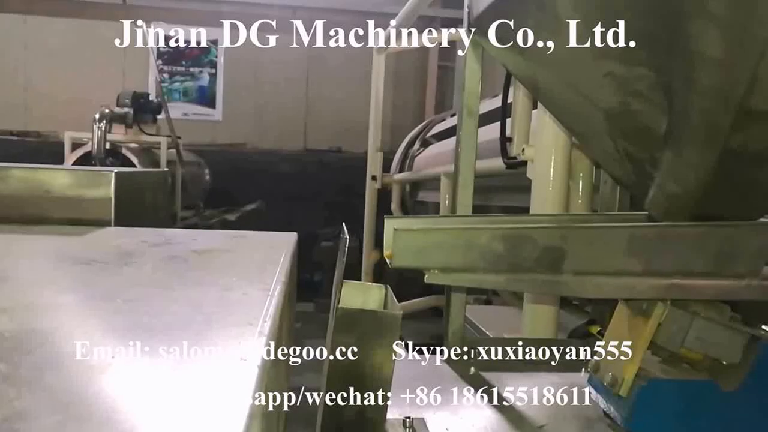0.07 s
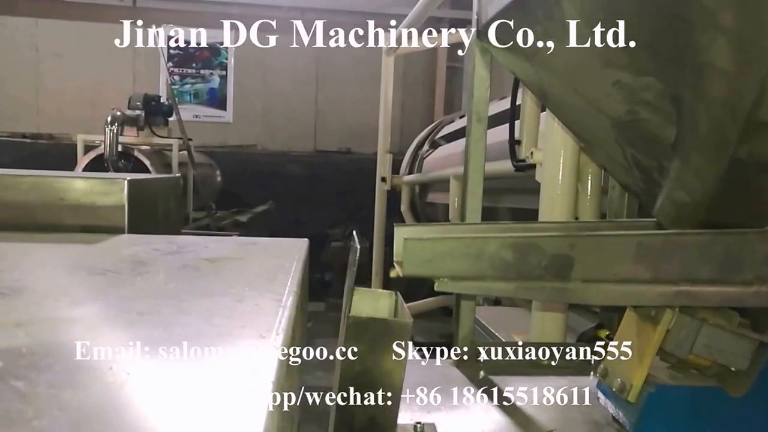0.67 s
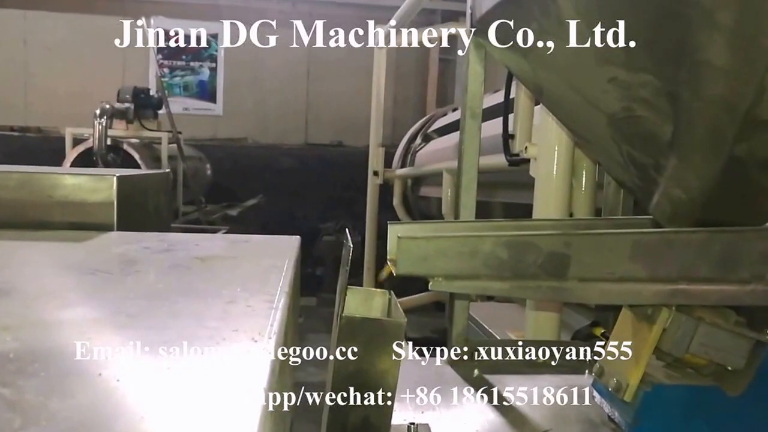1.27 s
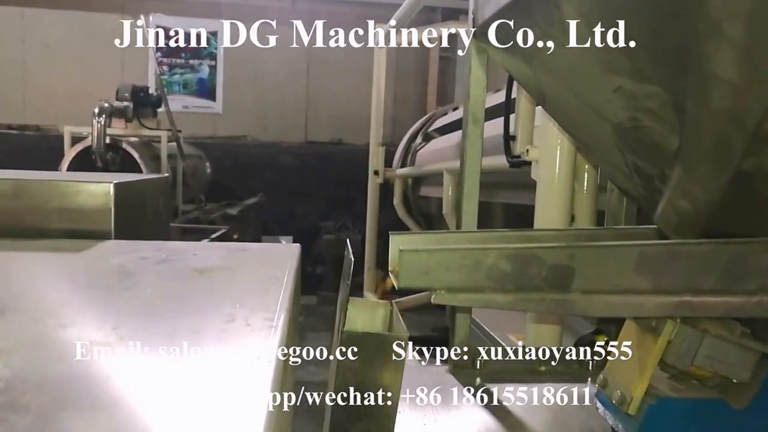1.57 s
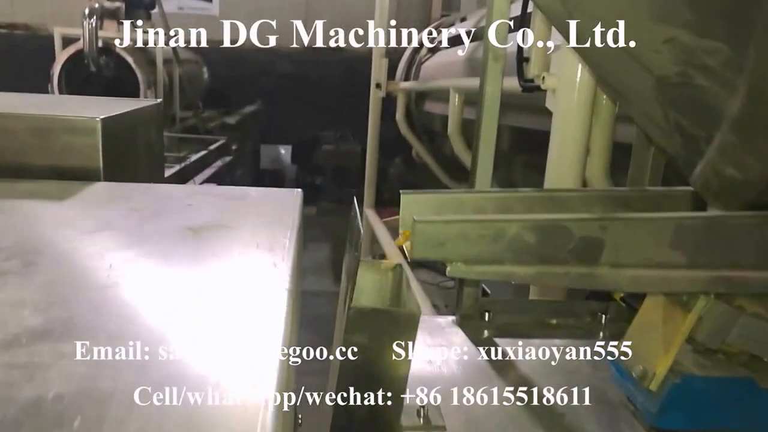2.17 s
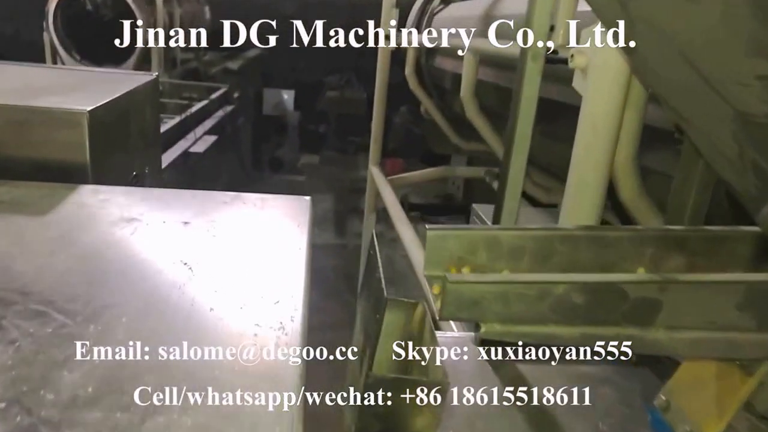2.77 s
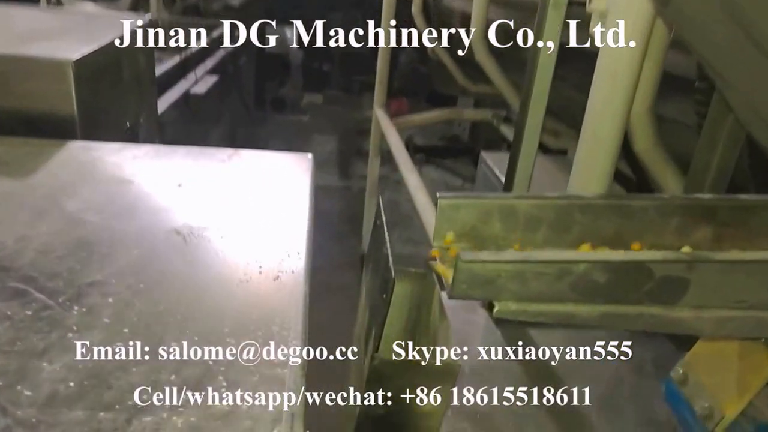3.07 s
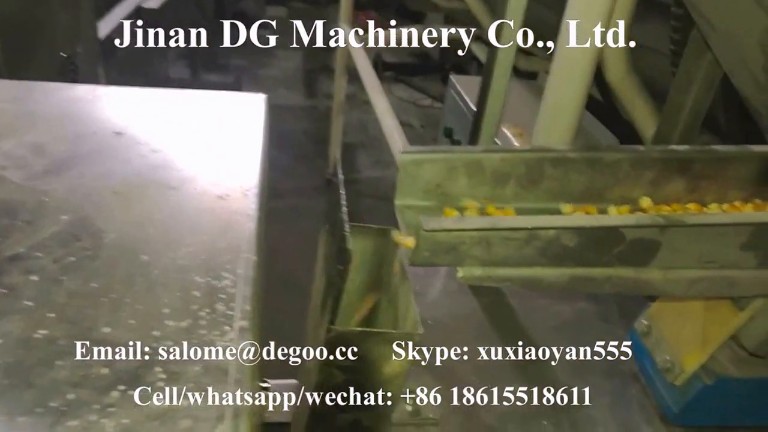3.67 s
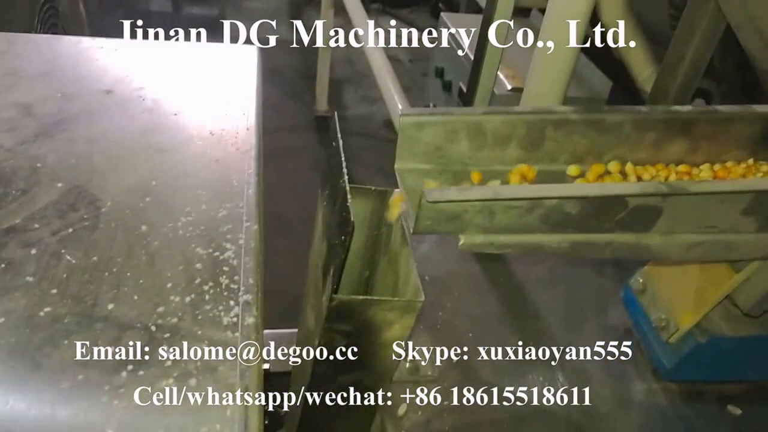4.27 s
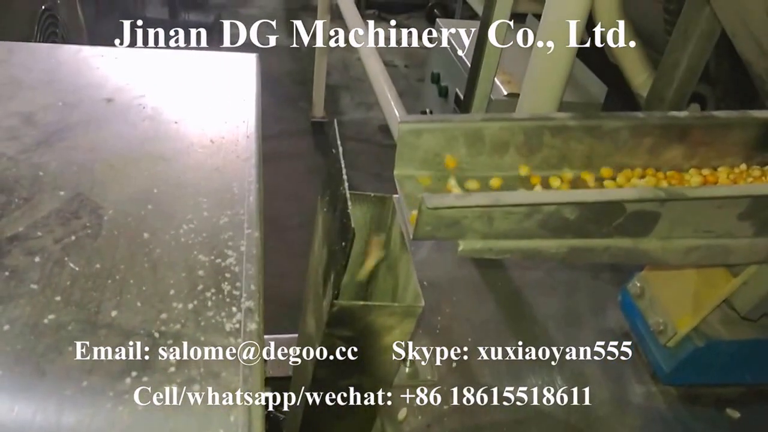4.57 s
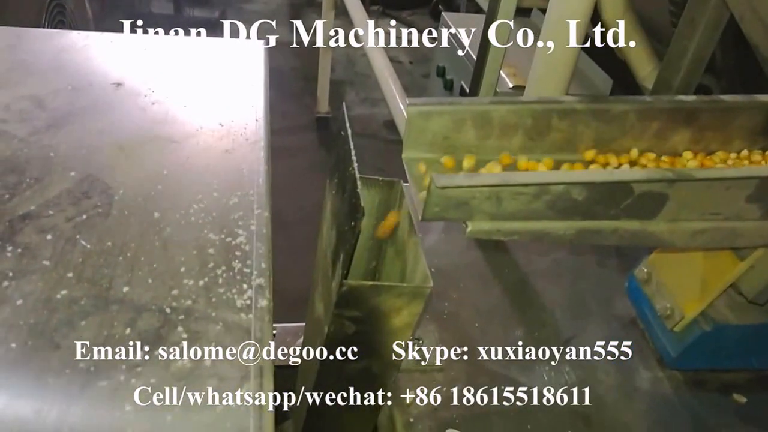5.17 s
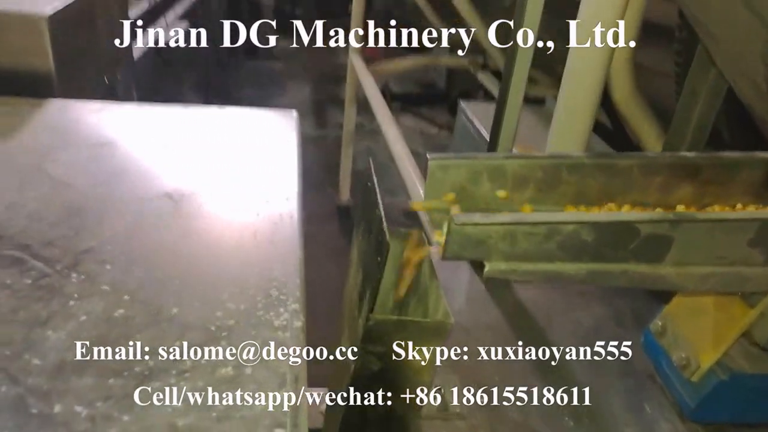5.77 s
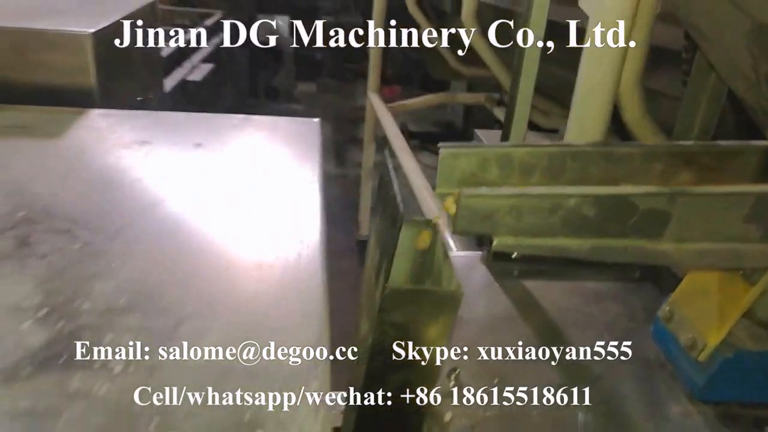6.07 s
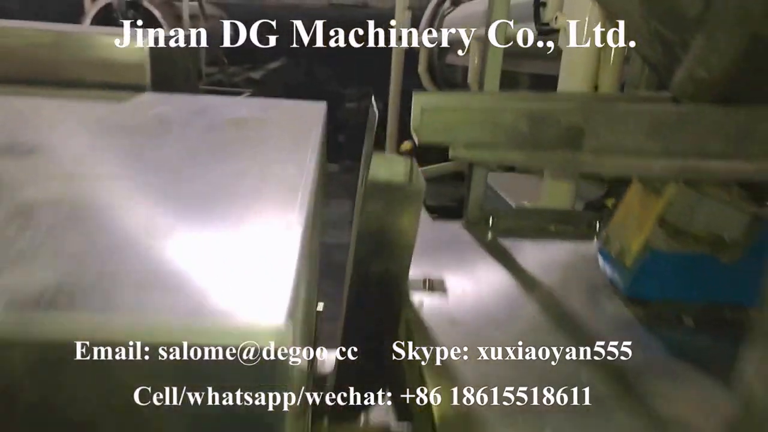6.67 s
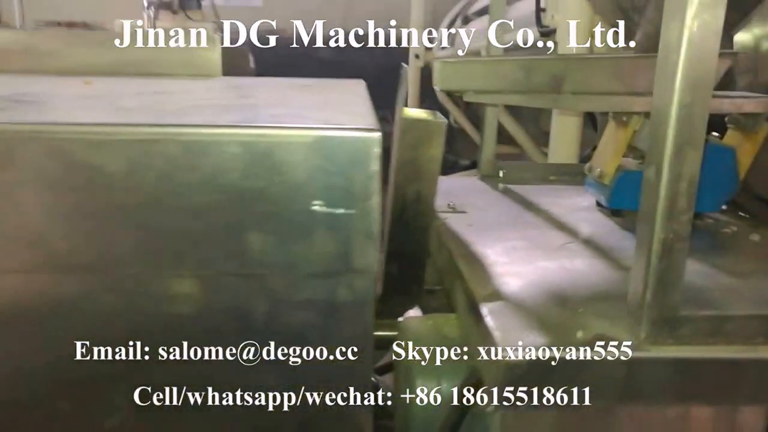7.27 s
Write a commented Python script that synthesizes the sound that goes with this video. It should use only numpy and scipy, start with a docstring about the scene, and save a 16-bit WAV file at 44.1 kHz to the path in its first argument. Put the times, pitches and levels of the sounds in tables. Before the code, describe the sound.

Loud factory machinery hums and rattles as little hard pieces tick against sheet steel, with three close knocks as the noise sinks.

```python
"""In a factory hall, a vibrating steel feeder shakes hard little snack pieces along its trough into a chute.
The pieces hop in step with the 50 Hz drive, and their impacts excite the modes of the sheet metal.
A big hopper drones at its panel resonances, the magnet hums, and three knocks sound at the microphone.
The drone and rattle step down after two of the knocks and keep sinking, the patter grows fainter,
and a farther machine is heard swishing twice a second."""
import sys
import numpy as np
from scipy import signal
from scipy.fft import rfft, irfft, next_fast_len
from scipy.io import wavfile
from scipy.ndimage import uniform_filter1d

SR = 44100
rng = np.random.default_rng(int(sys.argv[2]) if len(sys.argv) > 2 else 0)


def pcm_store(signal):
    """Save signal as 16-bit PCM."""
    levels = np.round(np.clip(np.atleast_2d(signal), -1, 1) * 32767)
    wavfile.write(sys.argv[1], SR, levels.astype(np.int16).T)


N = 322812
TIME = np.arange(N) / SR

# Modes of the chute and of the trough's lip. Each row: frequency in Hz, relative level in dB.
CHUTE_MODES = [(7930, -4), (9290, 0), (9570, -5), (9730, -1), (10450, -4), (10977, -1), (11304, -4),
               (11882, -3), (12180, -1), (12455, -3), (14249, -6)]
LIP_MODES = [(1690, 0), (1860, 3.5), (2100, 1), (2370, 2), (2634, 1), (3190, 2), (3439, -3), (4015, 2.5),
             (4294, 0), (4450, -2), (4909, 1), (5185, 0), (5580, -2), (7090, 3)]
# Spectra of a bright tick and a duller clank. Each row: frequency in Hz, relative density in dB.
TICK_SPECTRUM = [(1000, -44), (4000, -10), (7900, -4), (8600, -4.5), (9400, 2), (12800, 0.5), (14500, -2),
                 (16000, -4.5)]
CLANK_SPECTRUM = [(300, -18), (1400, -12), (2400, -2), (3200, 1), (5100, 1), (8000, -4.5), (16000, -45)]


def trough(din_db, sing_start_s=1.41, sing_end_s=2.47, sing_edge_s=.044):
    """Impact excitation: hopping pieces rattle the trough, and the heavier ones ring its modes."""
    # Each row: frequency in Hz, relative level in dB, time to decay by 60 dB in seconds.
    trough_modes = [(2095, -10, .12), (2355, -9, .7), (2388, -9, .9), (2520, -8, .12), (2636, 0, .17),
                    (3140, -1.5, .08), (3283, -4, .6), (3439, -5, .25), (4908, -6.5, .2), (5860, -9, .3),
                    (6220, -7, .3)]
    # Each row: frequency in Hz, relative density in dB.
    rattle_spectrum = [(500, -11.5), (1400, -2), (2000, 3), (3300, 4), (3700, 1), (4300, 1.5), (5100, 2.5),
                       (5450, 0), (7600, 1), (10000, -12.5), (16000, -26)]
    hits = impacts(per_s=650 * from_db(din_db / 2), spread_db=6.5, bunching=.6)
    heavy_hits = impacts(per_s=60, spread_db=3.5, bunching=.6)
    # For a spell the trough sings out, one mode above all.
    spell = np.clip(np.minimum(TIME - sing_start_s, sing_end_s - TIME) / sing_edge_s, 0, 1)
    ringing = evened(modes(heavy_hits, trough_modes), size=SR // 2)
    leading = evened(ring(hits * rng.standard_normal(N), hz=2388, t60=.6))
    rattle = evened(struck(hits, rattle_spectrum, t60=.066))
    return (from_db(-33.5 + 1.2 * din_db + 4.5 * spell) * ringing
            + from_db(-37) * spell * leading
            + from_db(-26.8 + 1.33 * din_db) * rattle)


def patter(stream_db):
    """Superposition: the ticks of many pieces tumbling into the chute merge into a patter."""
    hits = impacts(per_s=340, spread_db=5.7, bunching=.9)
    ticks = rms_one(struck(hits, TICK_SPECTRUM, t60=.045))
    ringing = from_db(-10.5) * modes(hits, CHUTE_MODES, t60=.075)
    return from_db(-28.5 + .84 * stream_db) * evened(ticks + ringing)


def hard_landings(clink_hz=3180):
    """Rebound: a piece ticks, clanks and rings the chute at each contact; the lip clinks once."""
    # Each row: start in seconds, relative tick level in dB, relative clank and clink level in dB.
    landings = [(0.5472, -12, -27), (0.618, -13, -27), (0.7223, -16, -23), (0.9038, -13, -25),
                (1.1792, -9.5, -20), (1.4098, -13, -24), (1.6656, -10, -21), (1.6824, -9, -23),
                (2.0638, -13, -26), (2.1046, -14, -19), (2.2338, -12, -19), (2.2928, -16, -20),
                (2.3236, -14, -19), (2.3735, -10, -22), (2.3884, -11, -22), (2.4704, -12, -28),
                (2.7457, -9.5, -19), (2.872, -10, -26), (3.0396, -13, -21), (3.1279, -11.5, -30),
                (3.3214, -7.5, -20), (3.3599, -9, -29), (3.5064, -10, -32), (3.705, -11.5, -32),
                (3.9544, -16, -30), (3.9909, -14, -37), (4.137, -12, -37), (4.2014, -14, -40),
                (4.31, -16, -38), (4.4629, -14, -33), (4.688, -9.5, -33), (4.9038, -16, -44),
                (5.3503, -16.5, -39), (5.4211, -18, -46), (5.745, -21, -41), (6.0701, -20, -39),
                (6.295, -22, -42)]
    # A piece chatters, hops and comes down again. Each row: mean delay in seconds, gain in dB.
    contacts = [(0, 0), (.003, -4.5), (.007, -7), (.039, -10)]
    out, hits = np.zeros(N + SR), np.zeros(N)
    for start_s, tick_db, clink_db in landings:
        tick = sheet(TICK_SPECTRUM, t60=.05, tail_db=-18, rise_s=.0003, uneven_db=4)
        clank = sheet(CLANK_SPECTRUM, t60=.07, tail_db=-14)
        blow = from_db(tick_db - 7.5) * tick + from_db(clink_db - 8.5) * clank
        for delay_s, db in contacts:
            at = int((start_s + delay_s * rng.uniform(.85, 1.15)) * SR)
            hits[at] = from_db(tick_db + db)
            out[at:at + len(blow)] += from_db(db) * blow
    strikes = [(start_s, clink_db - 2, clink_hz) for start_s, _, clink_db in landings]
    clinks = lip_strikes(strikes, t60=.096, attack_s=.0012)
    return out[:N] + from_db(-40) * modes(hits, CHUTE_MODES, t60=.09) + clinks


def lip_tinkle(stream_db):
    """Free vibration: single pieces clank on the lip and leave its modes to die away."""
    hits = impacts(per_s=65, spread_db=3.5, bunching=.7)
    ringing = modes(hits, LIP_MODES, t60=.15)
    clanks = from_db(-1.5) * rms_one(struck(hits, CLANK_SPECTRUM, t60=.07))
    return from_db(-39.7 + .5 * stream_db) * evened(ringing + clanks, size=SR // 2)


def lip_pings():
    """Light damping: some pieces leave the lip ringing long enough for a clear pitch."""
    # Each row: start in seconds, level at the favoured pitch in dB, that pitch in Hz.
    strikes = [(0.515, -29, 3439), (0.55, -28, 2634), (0.64, -27, 4909), (0.75, -27, 2634),
               (0.904, -26, 4370), (1.185, -27, 4909), (1.195, -26, 3439), (1.275, -25, 2634),
               (1.505, -25, 2634), (1.68, -24, 2634), (1.76, -28, 4909), (1.79, -22, 2634),
               (2.324, -24, 3439), (2.38, -28, 4909), (3.17, -30, 2355), (3.758, -33, 4400),
               (3.945, -34, 2355), (4.185, -34, 4015), (4.995, -38, 1860), (5.004, -38, 2634),
               (5.042, -37, 1860), (5.155, -37, 2400), (5.555, -41, 4015), (5.935, -39.5, 4100),
               (5.99, -37, 2355), (5.69, -40, 3190), (6.09, -42, 4294), (6.55, -41, 4909),
               (6.575, -41, 4015), (6.58, -38, 3190)]
    return lip_strikes(strikes, t60=.28, attack_s=.005)


def lip_strikes(strikes, t60, attack_s, fall_db_per_octave=80):
    """Selective excitation: a strike rings the lip's modes near the pitch that its spot favours."""
    out, t = np.zeros(N + SR), TIME[:SR // 4]
    hz = np.transpose(LIP_MODES)[0]
    envelope = np.minimum(t / attack_s, 1) * from_db(-60 * t / t60)
    partials = np.sin(2 * np.pi * np.outer(hz, t)) * envelope
    for start_s, db, favoured_hz in strikes:
        gains = from_db(db - fall_db_per_octave * abs(np.log2(hz / favoured_hz)))
        at = int(start_s * SR)
        out[at:at + len(t)] += (gains * rng.choice([-1, 1], len(hz))) @ partials
    return out[:N]


def radiated(x):
    """Radiation efficiency: lip and chute give off hardly any sound in a few narrow bands."""
    # Each row: centre frequency in Hz, width in Hz.
    dead_bands = [(2920, 90), (3700, 260), (5400, 380), (6060, 170)]
    for hz, width in dead_bands:
        x = signal.lfilter(*signal.iirnotch(hz, hz / width, fs=SR), x)
    return x


def hopper(din_db):
    """Forced vibration: the shaken hopper's panels drone, over a rumble and the drive's hum."""
    # Each row: frequency in Hz, width in Hz, relative level in dB.
    panel_modes = [(204, 12, -10.5), (245, 32, -9), (296, 30, -2), (314, 30, -12), (472, 28, -18)]
    # Each row: frequency in Hz, level against the drone at full din in dB, dB gained per dB of din.
    hum_tones = [(100, -19, 0), (755, -19, .6)]
    # Two low noises. Each row: frequency in Hz, relative density in dB.
    boom_spectrum = [(25, -27), (60, -0.5), (130, -6.5), (190, 4.5), (400, -3.5), (700, -7.5), (3000, -65)]
    rumble_spectrum = [(400, 0), (700, -2.5), (850, 3.5), (1200, 1), (1500, -7.5), (2500, -1),
                       (6000, -16.5)]
    # The drone swells. Each row: time of the peak in seconds, rise in dB.
    swells = [(0.4, 2), (0.91, 2.5), (1.36, 3), (1.62, 2.5), (3.28, 3.5), (5.19, 3), (5.55, 4.5),
              (7.26, 7.5)]
    # The big wall booms above the other panels and drops back as the din sinks.
    wall = from_db(2.3 + .36 * din_db) * panel(hz=268, width_hz=16)
    panels = wall + sum(from_db(db) * panel(hz, width) for hz, width, db in panel_modes)
    hum = sum(from_db(db + slope * din_db) * np.sqrt(2) * np.sin(2 * np.pi * (hz * TIME + rng.random()))
              for hz, db, slope in hum_tones)
    drone = evened(panels, size=SR // 3) + hum + from_db(-6.5) * noise(boom_spectrum)
    rumble = from_db(-31 + 1.45 * din_db) * noise(rumble_spectrum)
    return from_db(-29.5 + din_db + bumps(swells, width_s=.11)) * drone + rumble


def close_knocks(bump_hz=38, bump_t60=.069):
    """Damped transients: each knock at the microphone is a dry crack, a low thud and a deep bump."""
    # Each row: start in seconds, thud gain in dB, crack gain in dB.
    knocks = [(3.322, -38, -16.5), (3.705, -33, -28), (4.689, -30, -21.5)]
    out, t = np.zeros(N + SR), TIME[:SR // 4]
    bump = from_db(5 - 60 * t / bump_t60) * np.sin(2 * np.pi * bump_hz * t)
    for start_s, thud_db, crack_db in knocks:
        thud = sheet([(35, 2), (80, -2), (200, -5), (2000, -48)], t60=.061, tail_db=-22, uneven_db=3)
        crack = sheet([(200, -4), (1600, -2), (16000, -19)],
                      t60=.015, tail_db=-37, rise_s=.00051, uneven_db=4)
        at = int(start_s * SR)
        out[at:at + len(t)] += from_db(thud_db) * (bump + thud) + from_db(crack_db) * crack
    return out[:N]


def far_machine(period_s=.508, beat_at_s=5.135, attack_s=.0061, hold_s=.035, fade_s=.38):
    """Reverberant decay: a farther machine swishes once a cycle, and each swish fades in the hall."""
    # Each row: frequency in Hz, relative density in dB.
    swish_spectrum = [(200, -17), (500, -3.5), (900, 5), (1500, 1.5), (4000, 1.5), (7000, -8), (16000, -22)]
    age = (TIME - beat_at_s) % period_s
    stroke = np.minimum(age / attack_s, 1) * np.exp(-np.maximum(age - hold_s, 0) / fade_s)
    level_db = in_time([(5.04, -45), (5.6, -39)])
    return from_db(level_db) * stroke * noise(swish_spectrum)


def hall():
    """Ambient noise: the rest of the hall blends into a steady broadband floor."""
    # Each row: frequency in Hz, relative density in dB.
    hall_spectrum = [(25, 6), (90, 12), (500, 9.5), (1000, 0), (2000, 10.5), (4000, 2.5), (16000, -14)]
    return from_db(-48.5) * noise(hall_spectrum)


def impacts(per_s, spread_db, bunching, drive_hz=49.97):
    """A modulated Poisson process: landings of uneven force bunch on the upstroke of the drive."""
    stroke = np.exp(bunching * np.sin(2 * np.pi * drive_hz * TIME - 2 * np.pi / 3))
    landed = rng.random(N) < per_s * stroke / stroke.mean() / SR
    return landed * from_db(spread_db * np.clip(rng.standard_normal(N), -2, 2))


def struck(hits, spectrum, t60, dwell_s=.05, spots=22):
    """Convolution: each spot has its own response, so the timbre shifts as the pieces move about."""
    visit = (TIME / dwell_s + 2 * rng.random(N)).astype(int)
    spot = rng.integers(0, spots, N)[visit]
    blows = [rms_one(sheet(spectrum, t60, tail_db=-9)) for _ in range(spots)]
    return sum(signal.oaconvolve(hits * (spot == k), blow)[:N] for k, blow in enumerate(blows))


def sheet(spectrum, t60, tail_db, rise_s=.0033, uneven_db=4.5, tail_t60=.22):
    """Dense modes: a blow, as on sheet steel, is unevenly coloured noise dying fast to a faint tail."""
    t, hz = TIME[:SR // 4], np.geomspace(30, 16000, num=220)
    points_hz, points_db = np.transpose(spectrum)
    colour_db = np.interp(np.log(hz), np.log(points_hz), points_db)
    colour_db += uneven_db * rng.standard_normal(len(hz))
    fading = from_db(-60 * t / t60) + from_db(tail_db - 60 * t / tail_t60)
    return noise(np.column_stack([hz, colour_db]), size=len(t)) * fading * (1 - np.exp(-t / rise_s))


def modes(hits, table, t60=None):
    """Modal sum at rms 1: each landing excites each mode anew; a given t60 sets all the decays."""
    at, out = np.flatnonzero(hits), 0
    strengths = rng.standard_normal((len(at), len(table)))
    for (hz, db, *own_t60), strength in zip(table, strengths.T):
        force = np.zeros(N)
        force[at] = hits[at] * strength
        out = out + from_db(db) * rms_one(ring(force, hz, t60 or own_t60[0]))
    return rms_one(out)


def panel(hz, width_hz):
    """Resonance: a randomly shaken panel gives a narrow, throbbing tone with steep skirts; rms 1."""
    t60 = np.log(1000) / np.pi / width_hz
    return rms_one(ring(ring(rng.standard_normal(N), hz, t60), hz, t60))


def ring(force, hz, t60):
    """A damped oscillator: one mode that decays by 60 dB in t60 seconds."""
    radius, angle = from_db(-60 / (t60 * SR)), 2 * np.pi * hz / SR
    feedback = [1, -2 * radius * np.cos(angle), radius * radius]
    return signal.lfilter([np.sin(angle), 0, -np.sin(angle)], feedback, force + 1e-18)


def noise(spectrum, size=N):
    """Spectral shaping: noise coloured by (Hz, dB) points and rolled off below 20 Hz; rms 1."""
    hz, db = np.transpose(spectrum)
    length = next_fast_len(size, True)
    bins = np.maximum(np.fft.rfftfreq(length, 1 / SR), 1)
    gain = from_db(np.interp(np.log(bins), np.log(hz), db)) * bins / np.hypot(bins, 20)
    return rms_one(irfft(rfft(rng.standard_normal(length)) * gain, length)[:size])


def evened(x, size=SR // 7):
    """Division by the running rms holds the slow level at 1 and keeps the fast detail."""
    return x / np.sqrt(np.abs(uniform_filter1d(x * x, size=size)) + 1e-12)


def rms_one(x):
    """Normalisation to rms 1."""
    return x / np.sqrt(np.mean(x ** 2) + 1e-20)


def from_db(db):
    """Decibels to amplitude ratio."""
    return 10 ** (np.asarray(db) / 20)


def in_time(curve):
    """Linear interpolation between (seconds, value) points."""
    return np.interp(TIME, *np.transpose(curve))


def bumps(table, width_s):
    """Gaussian rises or falls of level, in dB."""
    return sum(db * np.exp(-((TIME - centre_s) / width_s) ** 2) for centre_s, db in table)


def scene(full_din_db=-24, full_stream_db=-30):
    """Superposition: feeder, chute and hopper close by add to the hall behind."""
    # Levels of the drone and rattle, and of the stream's patter. Each row: time in seconds, relative dB.
    din_level_curve = [(0.35, -25), (1.78, -25.5), (2.93, -30), (3.32, -30), (3.41, -34.5), (4.65, -35),
                       (4.8, -40), (6.99, -42), (7.1, -44.5)]
    stream_level_curve = [(0.45, -29.5), (2.17, -29), (2.78, -30.5), (3.27, -25.5), (3.75, -35),
                          (4.48, -31.5), (4.68, -36.5), (6.02, -37.5), (6.94, -50.5), (7.3, -46)]
    # The level dips briefly. Each row: centre in seconds, change in dB.
    dips = [(1.09, -2.5), (4.79, -4.5)]
    din_db = in_time(din_level_curve) - full_din_db
    stream_db = in_time(stream_level_curve) - full_stream_db
    steady = hopper(din_db) + trough(din_db) + radiated(lip_tinkle(stream_db) + patter(stream_db))
    steady *= from_db(bumps(dips, width_s=.052))
    blows = radiated(hard_landings()) + lip_pings() + close_knocks()
    return (steady + blows + far_machine() + hall())[None]


def record(dry, silence_s=.095, fade_in_s=.23, cutoff_hz=15780):
    """Band limiting: a steep low-pass cuts the top; the sound fades in after a short silence."""
    opening = np.clip((TIME - silence_s) / fade_in_s, 0, 1)
    low_pass = signal.ellip(12, .1, 80, cutoff_hz, fs=SR, output="sos")
    return signal.sosfilt(low_pass, dry * opening)


dry = scene()
out = record(dry)
pcm_store(out)
```